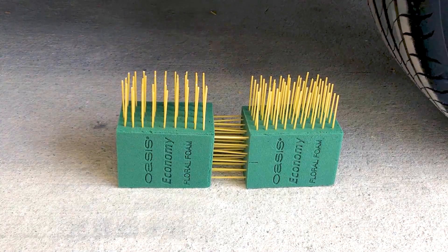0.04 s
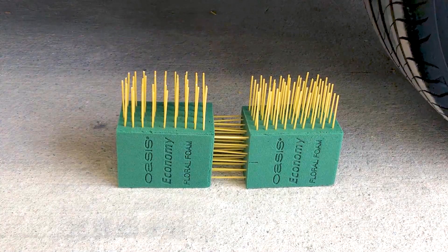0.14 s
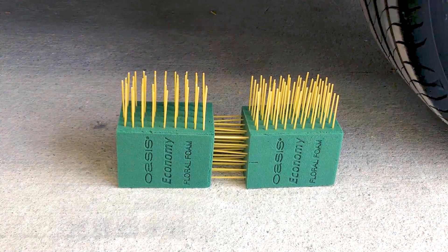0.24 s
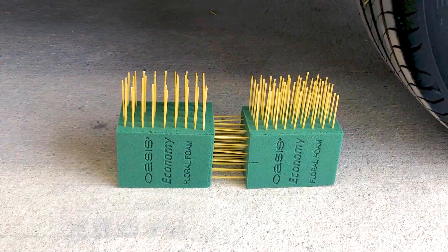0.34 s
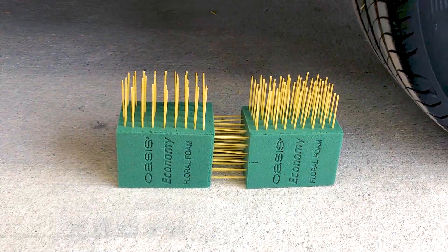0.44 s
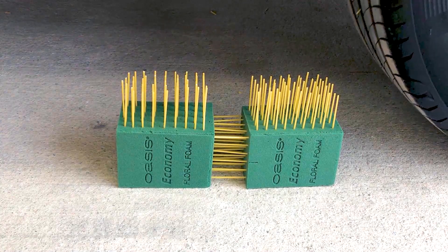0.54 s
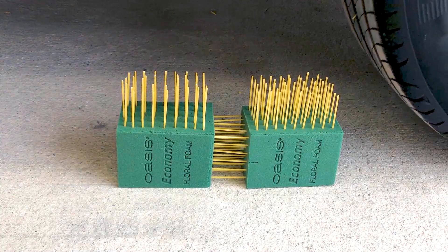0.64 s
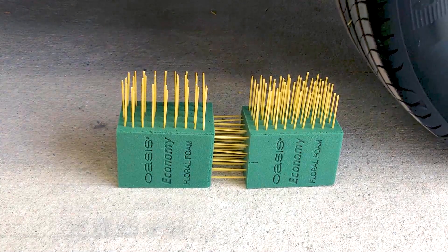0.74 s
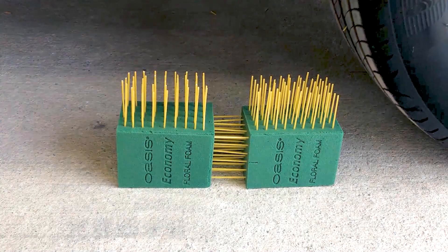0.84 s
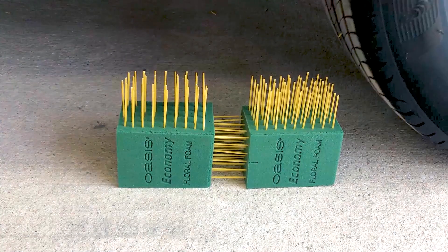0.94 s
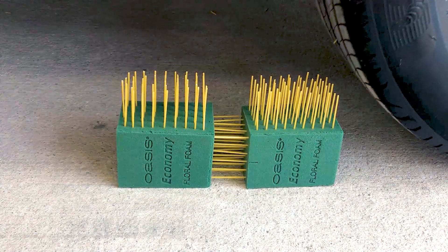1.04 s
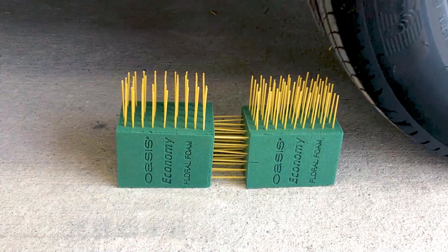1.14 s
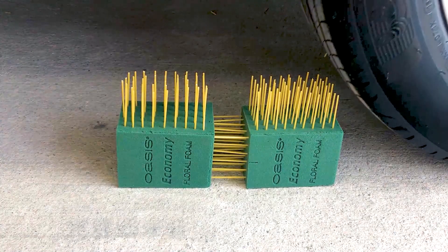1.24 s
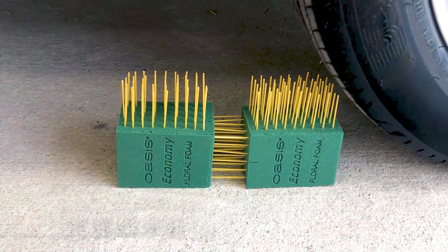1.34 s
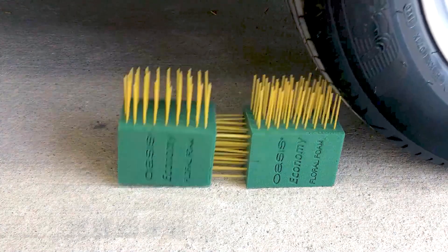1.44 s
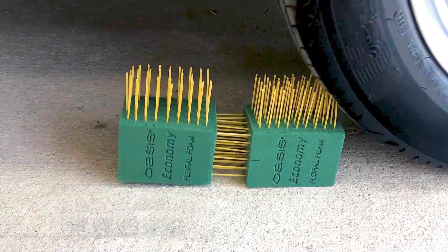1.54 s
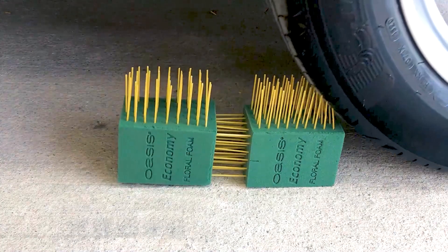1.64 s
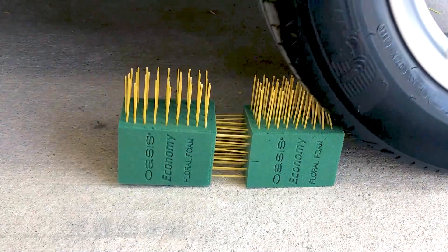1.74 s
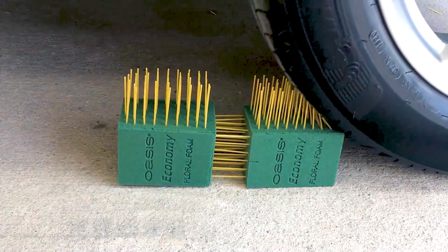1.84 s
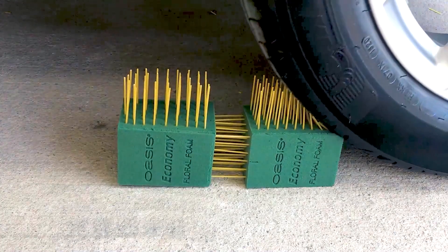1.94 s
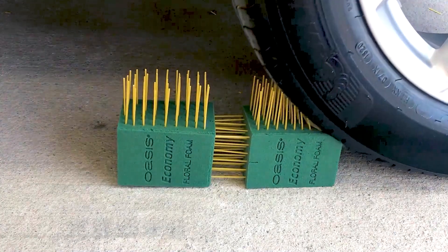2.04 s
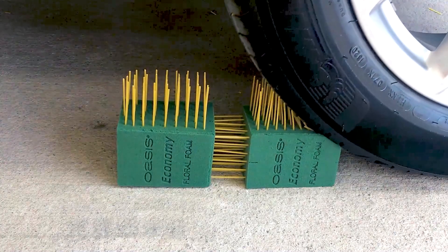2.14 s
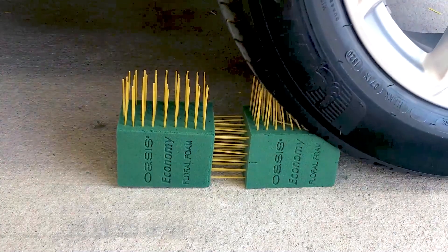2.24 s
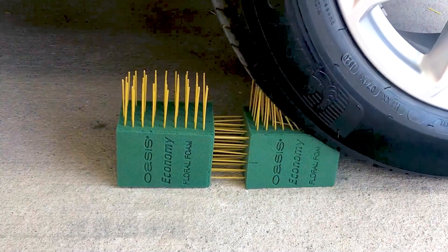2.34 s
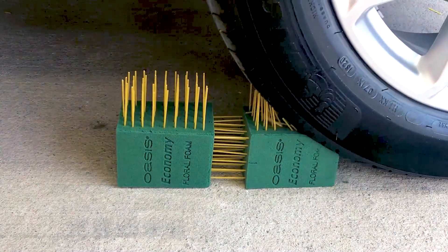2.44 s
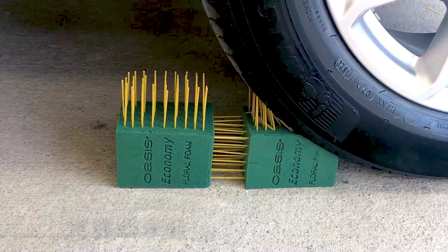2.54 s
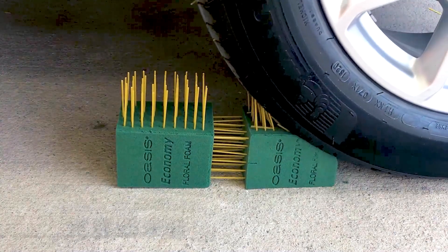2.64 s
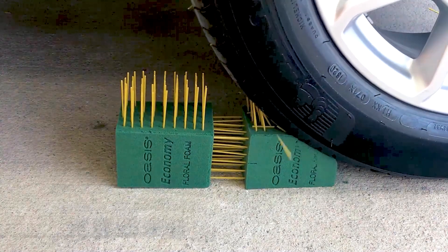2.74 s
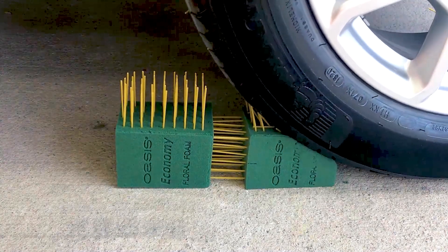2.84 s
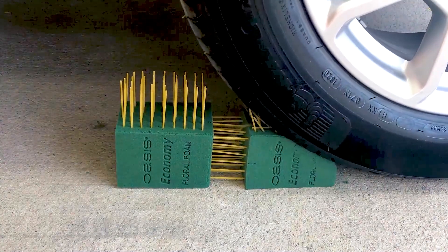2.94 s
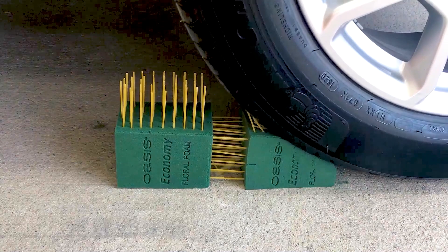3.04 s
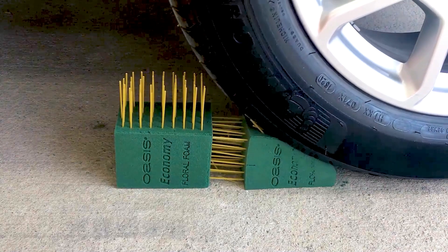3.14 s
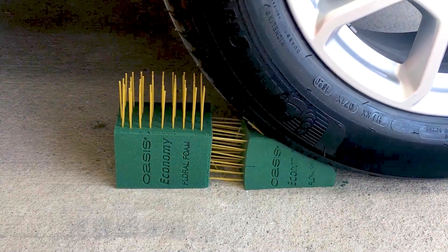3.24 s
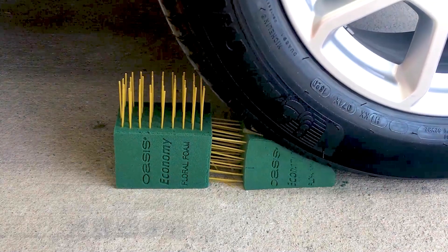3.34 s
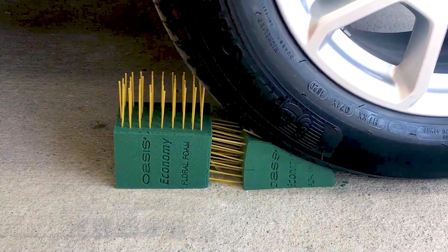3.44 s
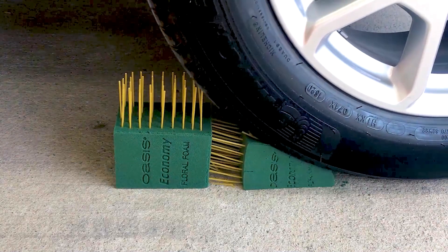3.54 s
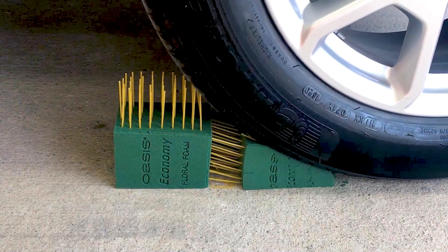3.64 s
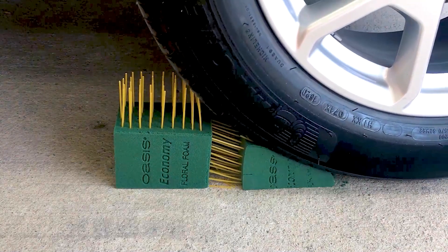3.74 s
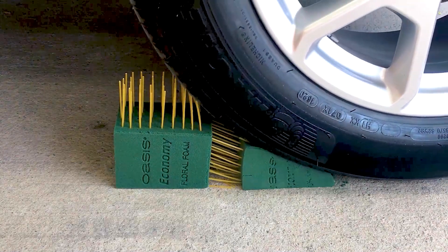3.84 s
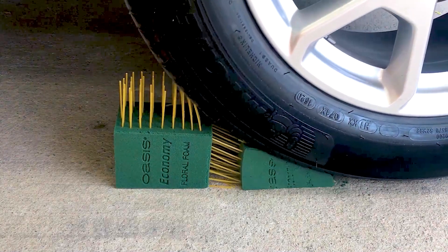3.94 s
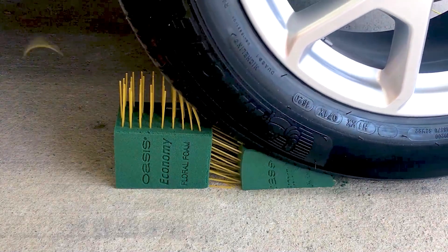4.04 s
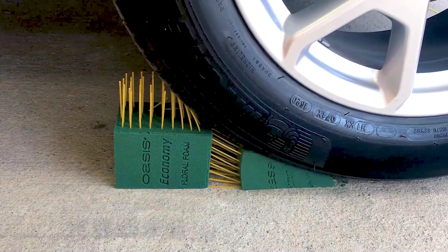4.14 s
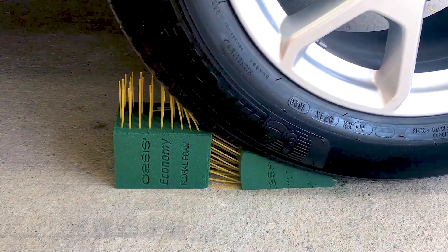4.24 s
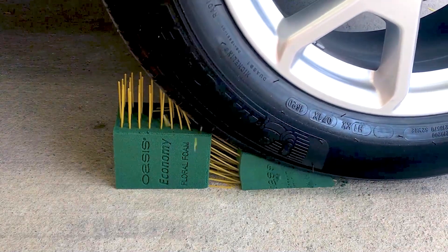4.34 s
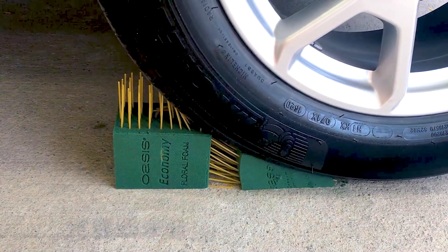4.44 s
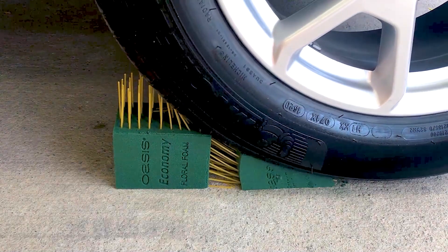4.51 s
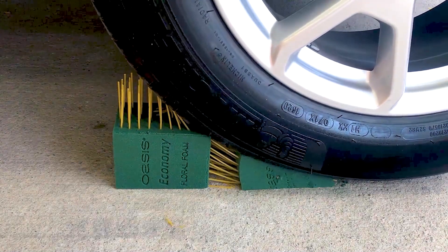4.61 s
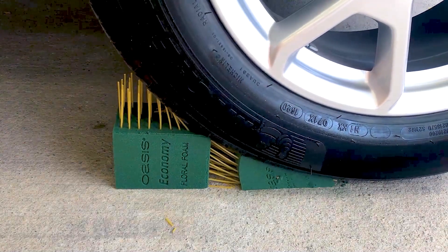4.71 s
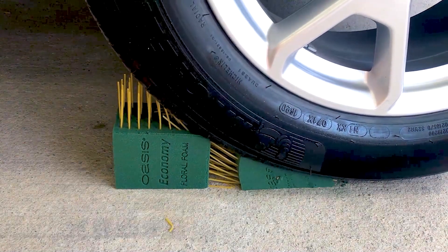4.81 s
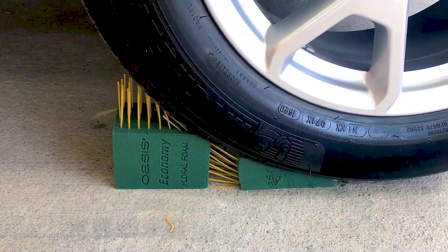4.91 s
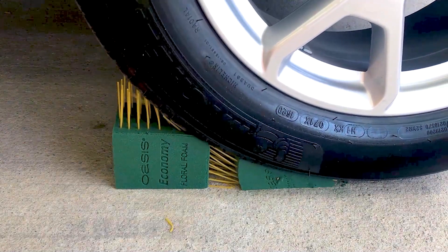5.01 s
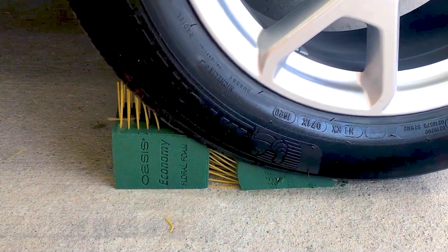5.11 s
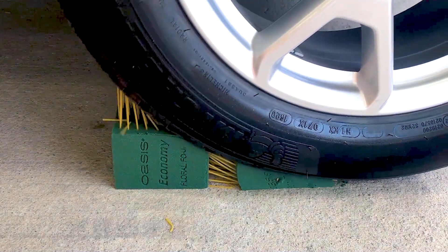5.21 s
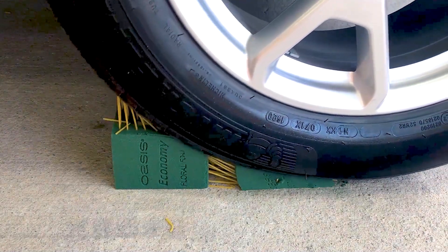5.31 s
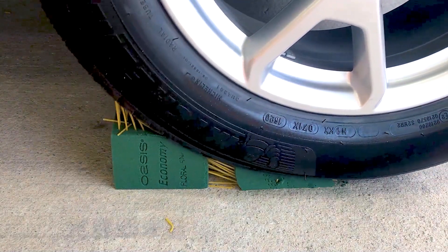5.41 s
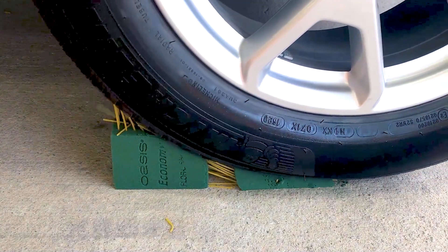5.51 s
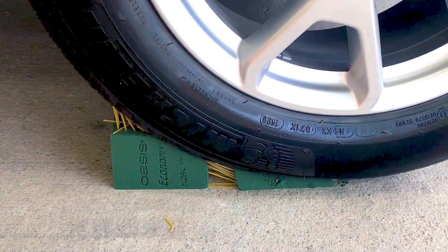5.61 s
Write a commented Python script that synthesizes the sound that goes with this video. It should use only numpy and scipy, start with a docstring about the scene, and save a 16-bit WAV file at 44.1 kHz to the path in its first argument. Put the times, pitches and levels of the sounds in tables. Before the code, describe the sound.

A steady engine idle rumbles quietly behind a slowly rolling tyre. Fine crisp foam hiss arrives first, quickly joined by bright dry stick cracks, tiny twangs and splintering, thickest around two seconds. Sparser snaps and fresh bursts follow, with low knocks near four seconds and a last lively cluster after five. The sound is close and mono, on concrete, with short reflections from the gap under the car.

```python
"""On concrete, near a single microphone, a car creeps over brittle foam blocks stuck full of thin wooden sticks.
Sticks slip, twang and snap one by one: decaying sines with wandering phase, and bursts of filtered noise.
The gap between car and ground answers snaps and thuds with a short echo, a convolution with decaying noise.
The tyre crushes foam cells with a fine hiss of spiky noise, and the blocks creak and shift with dull notes.
Behind them the engine idles: sines at multiples of the firing rate, resonant noise and pulsing clatter."""
import sys
import numpy as np
from scipy import signal
from scipy.fft import rfft, irfft, next_fast_len
from scipy.io import wavfile
from scipy.ndimage import map_coordinates

SR = 44100
rng = np.random.default_rng(int(sys.argv[2]) if len(sys.argv) > 2 else 0)


def bounce(signal):
    """Save signal as a 16-bit WAV file at the path given by the first command-line argument."""
    frames = np.transpose(np.atleast_2d(signal))
    limited = np.clip(frames, -1, 1)
    pcm = np.round(limited * 32767).astype(np.int16)
    wavfile.write(sys.argv[1], SR, pcm)


N = 250047  # samples

# The louder sticks. Each row: start in seconds, twang pitch in Hz, twang level in dB, crack pitch in Hz,
# crack level in dB, splinter level in dB, tail level in dB; levels are before filtering.
STICK_SNAPS = [(1.8695, 3240, -26, 4100, -20, -23, -36), (1.878, 3180, -36, 3430, -39, -39, -40),
               (1.9243, 1990, -22.5, 6660, -23, -29, -42), (1.9323, 1800, -37, 4270, -37, -36, -39),
               (1.9393, 2970, -25, 4690, -26, -25, -30), (1.9469, 2400, -19, 4440, -23, -26, -30),
               (1.9652, 2600, -19.5, 4300, -18, -24, -28), (1.9694, 1020, -30, 3340, -31, -38, -39),
               (1.9755, 990, -39, 3790, -48, -38, -39), (1.9835, 1080, -41, 4040, -40, -39, -43),
               (1.9947, 2740, -33, 3620, -36, -39, -42), (2.0051, 1410, -33, 7050, -28.5, -28, -37),
               (2.0149, 1310, -25.5, 3220, -26, -32, -40), (2.0583, 1820, -30, 5650, -26, -28, -38),
               (2.0654, 1530, -25.5, 6660, -28, -21, -34), (2.0726, 2660, -30, 3830, -39, -42, -47),
               (2.079, 1470, -39, 6840, -36, -44, -44), (2.0834, 1400, -32, 3710, -27, -23, -35),
               (2.1364, 2520, -24, 7700, -32, -26, -39), (2.1466, 2800, -35, 4100, -20.5, -27, -37),
               (2.176, 2580, -28, 5660, -32, -31, -48), (2.1888, 1320, -31, 6760, -27, -28, -39),
               (2.21, 1640, -25, 6050, -30, -25, -39), (2.2492, 1370, -35, 4300, -25, -26, -54),
               (2.2582, 1270, -30, 4100, -19.5, -35, -41.5), (2.3167, 2610, -30, 3760, -23, -33, -46),
               (2.3232, 1450, -31, 6750, -25, -31, -39), (2.3387, 1600, -24.5, 3730, -30, -24, -34),
               (2.345, 1700, -50, 6140, -46, -41, -40), (2.3844, 1210, -30.5, 4430, -25.5, -28, -44),
               (2.4398, 1600, -31, 4370, -37, -26, -48), (2.4602, 1370, -28, 7470, -26, -33, -38),
               (2.4766, 1410, -29, 6290, -31.5, -31, -39), (2.5204, 2090, -32, 4400, -26, -30, -39.5),
               (2.5242, 2060, -35.5, 5400, -25.5, -24, -49), (2.5448, 2000, -45, 4000, -43, -43, -50),
               (2.6092, 1180, -43, 6100, -34.5, -39, -47), (2.6201, 2040, -32, 5430, -29.5, -30, -42),
               (2.6905, 1180, -39, 3970, -32.5, -29, -49), (2.7414, 1050, -36.5, 3970, -32.5, -28, -39),
               (2.7536, 1660, -36, 3940, -28.5, -35, -41), (2.7988, 1015, -30.5, 4000, -26.5, -25.5, -35.5),
               (2.8785, 2960, -43, 4300, -34, -32, -45), (2.892, 1310, -39, 4000, -34.5, -29, -41),
               (2.9608, 1040, -39, 6330, -38, -41, -42.5), (3.0144, 3160, -39, 4560, -32, -30, -48),
               (3.0254, 960, -28, 4170, -26, -26, -38), (3.0418, 1080, -39, 4500, -29, -23, -41),
               (3.0527, 1120, -31, 4490, -27, -30, -40), (3.0747, 3230, -32, 7240, -23, -27, -33),
               (3.0889, 1390, -20, 4190, -30, -22, -31), (3.0944, 1630, -25, 4300, -36, -37, -35),
               (3.102, 1150, -30, 3800, -47, -41, -37), (3.1109, 1480, -24, 3490, -25, -32, -37),
               (3.123, 3120, -27, 6100, -23.5, -22.5, -35), (3.1433, 1480, -24, 3310, -30, -31, -40),
               (3.1686, 1210, -38, 4260, -26, -34, -45), (3.1775, 1500, -43, 3250, -41, -34, -37.5),
               (3.2174, 2690, -47, 4010, -42, -45, -62), (3.2495, 1370, -42, 6680, -26, -24, -42.5),
               (3.2664, 2910, -46, 3980, -40, -34, -50), (3.4004, 2540, -38, 3900, -47, -36, -52),
               (3.4322, 1010, -27, 4200, -39, -29, -35), (3.4415, 954, -36, 4280, -38, -30, -35.5),
               (3.469, 1050, -37, 7120, -52, -39, -44), (3.491, 1047, -26, 3180, -35, -29, -33),
               (3.4969, 1100, -44, 7190, -52, -48, -38), (3.506, 1030, -44, 3310, -56, -50, -39),
               (3.5304, 2570, -29, 3930, -36, -27, -45), (3.5396, 1820, -24, 6900, -25, -20, -28.5),
               (3.5445, 2550, -25, 3590, -36, -37, -28.5), (3.5497, 978, -24.5, 3300, -38, -37, -36),
               (3.5591, 1740, -28, 3310, -38, -37, -37), (3.5682, 1600, -29, 5460, -40, -35, -39),
               (3.5887, 1630, -21, 3360, -43, -38, -39), (3.6419, 1600, -39, 3870, -52, -45, -45),
               (3.653, 1900, -47, 6650, -40.5, -47, -54), (3.6897, 1690, -47, 4540, -40, -40, -57),
               (3.6993, 2580, -47, 4300, -43, -51, -49), (3.7605, 1530, -37, 3950, -44, -50, -46),
               (3.7831, 1630, -41, 5440, -38, -38, -53), (3.8236, 2560, -40, 4150, -41, -26.5, -51),
               (3.8318, 2670, -41, 3310, -43, -38, -55), (3.8671, 1130, -24.5, 6100, -34, -29, -37),
               (3.962, 3250, -41, 3370, -31.5, -31, -47), (3.9672, 3350, -30, 3360, -29, -31, -42.5),
               (3.9733, 1700, -37, 3300, -33.5, -30, -42), (3.9985, 3220, -34, 3500, -39, -41, -48),
               (4.0244, 1350, -25, 3670, -41, -41, -33), (4.0293, 1190, -22, 3360, -29, -27, -32),
               (4.0378, 1060, -24, 3700, -34, -34, -30.5), (4.042, 1540, -39, 6100, -31.5, -31, -31),
               (4.096, 1680, -34, 5200, -35, -29, -40), (4.1105, 2730, -35, 3310, -40, -34, -44),
               (4.1289, 2890, -46, 3310, -48, -43, -45), (4.1484, 3200, -49, 3760, -34, -29.5, -54),
               (4.1605, 1830, -42, 7060, -29, -34, -42), (4.1695, 2590, -44, 3280, -38, -29, -51),
               (4.1795, 1720, -33, 4170, -30, -28, -43), (4.1863, 1930, -30, 4120, -26.5, -36, -42),
               (4.1984, 2150, -47, 4290, -32, -34, -49), (4.2064, 1670, -26, 4250, -26, -31, -42),
               (4.2271, 2830, -39, 3330, -46, -37, -36), (4.2353, 1650, -31, 4220, -29, -37, -42),
               (4.2452, 1710, -30.5, 4500, -33, -43, -31), (4.2535, 2700, -29, 3400, -34, -26.5, -36),
               (4.2645, 2870, -41, 3730, -36, -34, -49), (4.2838, 2770, -35, 3300, -36, -39, -37),
               (4.2934, 2700, -29, 3330, -50, -42, -44), (4.3007, 1630, -32, 3350, -41, -36, -43),
               (4.3192, 1960, -52, 4340, -38, -44, -61), (4.3324, 1620, -37, 4200, -40, -34, -49),
               (4.3401, 1710, -37, 4400, -42, -32, -46), (4.3742, 1760, -39, 5000, -31.5, -35, -45),
               (4.3886, 1140, -36, 4010, -37, -29, -53), (4.4038, 2030, -40, 5480, -30, -39, -44),
               (4.4128, 1850, -48, 4600, -33, -38, -53), (4.4184, 2520, -42, 4790, -35, -32, -52),
               (4.4277, 1720, -43, 4300, -35, -35, -56), (4.4374, 2140, -45, 4220, -35, -34, -50),
               (4.446, 980, -51, 7340, -38, -37, -57), (4.4618, 1850, -36.5, 4100, -36, -37, -50),
               (4.4718, 1880, -48, 4440, -36, -36, -53), (4.4805, 1120, -45, 4470, -31, -37, -54),
               (4.508, 1970, -29, 4270, -31, -33, -40), (4.5123, 2150, -35, 6800, -27.5, -36, -47),
               (4.5424, 2230, -42, 4600, -38, -39, -52), (4.549, 1750, -34, 7390, -33, -42, -42),
               (4.577, 3100, -45, 3560, -41, -43, -53), (4.648, 2800, -38, 3310, -45, -52, -54),
               (4.6566, 2540, -41, 4240, -33.5, -27, -47), (4.6716, 3160, -38, 6140, -35, -38, -43),
               (4.6865, 3140, -34, 3100, -30, -36, -46), (4.6918, 880, -40, 5600, -40, -32, -52),
               (4.7097, 1670, -40, 4270, -35.5, -44, -59), (4.7617, 1200, -37, 4510, -29, -38, -47),
               (4.7896, 2770, -38, 3370, -35, -36, -48), (4.7997, 1910, -34, 3350, -39, -39, -45),
               (4.8387, 2780, -37, 5600, -27, -38, -46), (4.8592, 3170, -42, 5730, -28, -38, -43),
               (4.8811, 1800, -36, 4160, -43, -46, -55), (4.908, 910, -44, 4140, -25, -29.5, -40),
               (4.9353, 2610, -35, 5650, -30, -35, -43.5), (4.9419, 1480, -46, 5200, -37, -39, -49),
               (4.9721, 1100, -45, 3500, -49, -49, -53), (4.9844, 1490, -36, 4200, -34, -37, -41),
               (5.0502, 1330, -39, 7100, -36, -44, -46), (5.0643, 1080, -30, 3900, -23.5, -20.5, -36),
               (5.0798, 2610, -25, 4400, -23.5, -27, -30), (5.1499, 1620, -35, 5020, -39, -32, -38),
               (5.1561, 1740, -39, 3310, -41, -34, -47), (5.1904, 1600, -29, 3370, -27.5, -20.5, -41),
               (5.1972, 1640, -28.5, 8000, -31, -29, -33), (5.2077, 3220, -31, 3310, -33, -27, -42),
               (5.2262, 1590, -28.5, 6450, -20.5, -26, -36), (5.2342, 1520, -28, 5000, -41, -37, -43),
               (5.2489, 2070, -30.5, 5230, -27, -33, -38), (5.28, 1880, -37, 3300, -42, -47, -29.5),
               (5.2864, 1850, -42, 4400, -34, -31, -48), (5.312, 1720, -29, 3350, -39, -39, -31),
               (5.3187, 1920, -24, 6480, -28.5, -40, -33), (5.3305, 2430, -29, 4290, -33, -33, -43),
               (5.3728, 1760, -45, 3660, -47, -43, -53), (5.3949, 1050, -32, 3310, -50, -48, -43),
               (5.405, 1620, -31, 3310, -38, -34, -37), (5.4141, 1540, -38, 4600, -37, -36, -43),
               (5.429, 1680, -38, 3280, -45, -33, -41), (5.4451, 2220, -30.5, 3450, -33, -31, -37),
               (5.4823, 2690, -21, 3180, -31, -41, -36), (5.4907, 2000, -24, 6600, -37, -37, -46),
               (5.5308, 1840, -38, 3310, -39, -33, -54), (5.5432, 1290, -46, 6770, -52, -53, -52),
               (5.5642, 2690, -21.5, 3400, -32.5, -42, -41), (5.5772, 2500, -27.5, 3310, -45, -42, -40),
               (5.5837, 2760, -36, 3340, -38, -41, -41), (5.5884, 2960, -36, 3260, -31, -37, -43),
               (5.5964, 2870, -39, 3360, -41, -35, -49), (5.6206, 2820, -42, 3310, -46, -44, -51),
               (5.6371, 1710, -44, 4530, -44, -44, -56), (5.6559, 1200, -35.5, 5250, -33.5, -35, -39)]
# Colour of the crack noise. Each row: frequency in Hz, gain in dB.
CRACK_COLOUR = [(900, -16.5), (2000, -19.5), (3500, -13), (4300, 2.5), (5000, -9.5), (6400, 0.5),
                (8000, -6), (11000, -14)]
# Colour of the splintering noise. Each row: frequency in Hz, gain in dB.
SPLINTER_COLOUR = [(4000, -39), (7500, -7), (9000, -0.5), (11500, -0.5), (13000, -4.5), (15500, -5)]
RISE_S, TWANG_CYCLES = .00075, 9  # rise time of twang and crack; t60 of the twang in cycles
RING_SHARE = 0.53  # scales how far a long stick's own ring replaces the block's answer in the tail


def sticks():
    """Released strain energy: each stick twangs, cracks with one bright resonance, splinters and drives the block."""
    rows = np.vstack([STICK_SNAPS, faint_snaps()])
    s, hz, db, crack_hz, crack_db, splinter_db, tail_db = rows.T[:, :, None]
    start = s[:, 0]
    t = np.arange(SR // 16) / SR
    noise = rng.standard_normal((8, len(s), len(t)))
    twang_walk, ping_walk, crack_noise, splinter_noise = noise[:4]
    block_noise, crack_lead_in, splinter_lead_in, ring_walk = noise[4:]

    # the pitch wanders as the broken stick rattles in its hole and sags as it comes free
    sag = .0001 * (1 - np.exp(-t / .0006))
    phase = 2 * np.pi * hz * (t + sag) + .05 * np.cumsum(twang_walk, axis=1)
    twang = amp(db) * blow(t, RISE_S, TWANG_CYCLES / hz) * np.sin(phase)

    long = 1 / (1 + (hz / 1300) ** 6)  # near 1 for long, low sticks, which ring on
    ring_phase = phase + 0.097 * np.cumsum(ring_walk, axis=1)
    ring = 2 * RING_SHARE * long * amp(tail_db) * blow(t, 0.0025, 0.042) * np.sin(ring_phase)

    ping_phase = 2 * np.pi * crack_hz * t + 0.2 * np.cumsum(ping_walk, axis=1)
    ping = amp(crack_db) * blow(t, RISE_S, 0.0021) * np.sin(ping_phase)

    shape = blow(t, 0.00036, 0.0047) + 0.04 * blow(t, 0.0026, 0.027)
    lead_in = amp(-9 - 60 * t[::-1] / 0.013)  # a faint noise swells for some milliseconds before each snap
    before = start - t[-1]
    crack = laid(start, amp(crack_db) * shape * crack_noise)
    crack = crack + laid(before, amp(crack_db) * lead_in * crack_lead_in)
    crack = filtered(crack, lambda f: amp(along(CRACK_COLOUR, f)))
    splinter = laid(start, amp(splinter_db) * shape * splinter_noise)
    splinter = splinter + laid(before, amp(splinter_db) * lead_in * splinter_lead_in)
    splinter = filtered(splinter, lambda f: amp(along(SPLINTER_COLOUR, f)))

    passed = np.sqrt(np.mean(np.abs(block(np.linspace(1, SR / 2, 2048))) ** 2))  # rms of noise through the block
    answer_level = (1 - RING_SHARE * long) * amp(tail_db) / passed
    answer = filtered(laid(start, answer_level * blow(t, 0.00095, 0.015) * block_noise), block)
    return filtered(laid(start, twang + ring + ping), small) + crack + splinter + answer


# Mean levels of the faint snaps: twang, crack, splinter and tail, in dB before filtering.
FAINT_DB = [-53.5, -52.5, -50, -72]
# Pitch range of the faint snaps. Lowest row, then highest row: twang in Hz, crack in Hz.
FAINT_HZ = [(950, 3400), (3000, 7200)]
FAINT_COUNT, FAINT_SPREAD_DB = 110, 5.5  # levels lie within twice the spread of their mean


def faint_snaps():
    """A random point process: rows like STICK_SNAPS, scattered from the first loud snap to the end."""
    when, pitch, size = np.hsplit(rng.random((FAINT_COUNT, 7)), [1, 3])
    first = STICK_SNAPS[0][0]
    s = first + when * (N / SR - first)
    low, high = np.array(FAINT_HZ)
    hz = low * (high / low) ** pitch
    db = FAINT_DB + FAINT_SPREAD_DB * (4 * size - 2)
    return np.column_stack([s, hz[:, 0], db[:, 0], hz[:, 1], db[:, 1:]])


def blow(t, rise, fall):
    """Pulse envelope, peak 1: a soft rounded rise, then exponential decay with t60 fall."""
    risen = (t / rise) ** 2 / (1 + (t / rise) ** 2)
    e = risen * amp(-60 * t / fall)
    return e / e.max(axis=-1, keepdims=True)


# Resonances of the foam block. Each row: frequency in Hz, width in Hz, relative gain in dB.
BLOCK_MODES = [(990, 47, 15), (1130, 56, 13), (1560, 700, 12), (2820, 1300, 6)]


def block(f):
    """Modal resonance and weak bass radiation: the foam block as heard from outside."""
    return modes(BLOCK_MODES, f) * small(f)


def small(f):
    """Radiation efficiency: small things radiate no bass."""
    return f ** 4 / (f ** 4 + 750 ** 4)


# Shifts of the blocks. Each row: start in seconds, pitch in Hz, level in dB, t60 in seconds.
BLOCK_SHIFTS = [(3.542, 494, -37.5, 0.11), (3.94, 246, -25, 0.024), (3.978, 142, -36, 0.082),
                (4.03, 617, -30.5, 0.056), (4.067, 187, -40.5, 0.067), (5.065, 554, -39, 0.049),
                (5.2, 567, -32, 0.037)]


def thuds():
    """Damped oscillation: the block jerks on the concrete with a dull, short, unsteady note."""
    s, hz, db, t60 = np.transpose(BLOCK_SHIFTS)[:, :, None]
    t = np.arange(SR // 6) / SR
    drift = hz / 5000 * np.cumsum(rng.standard_normal((len(s), len(t))), axis=1)
    envelope = amp(db - 60 * t / t60) * (1 - np.exp(-t / .003))
    return laid(s[:, 0], envelope * np.sin(2 * np.pi * hz * t + drift))


# Course of the crushing. Each row: time in seconds, relative cell hiss in dB, block creak in dB,
# fine dust relative to the hiss in dB.
CRUSHING = [(1.56, -52, -61, -4), (1.64, -44, -55.5, -4), (1.8, -41, -61, -3.5), (1.93, -41.5, -47.5, 0),
            (2.07, -43.5, -52, -0.5), (2.31, -45, -51.5, 0.5), (2.49, -50.5, -60, 4.5), (2.98, -55, -63, 9),
            (3.4, -63, -76, 11), (3.59, -61.5, -59, 6), (3.87, -57.5, -70, 3), (4.1, -51.5, -53, 0),
            (4.5, -68, -63, 7), (4.7, -60, -71, -4), (4.94, -64, -66, 3), (5.3, -50.5, -54, 2),
            (5.67, -61.5, -62, 3)]
# Colour of the bursting cells. Each row: frequency in Hz, relative density in dB per Hz.
CELL_COLOUR = [(880, -59), (1500, -44), (1950, -13), (2270, -14), (2500, 4), (3220, -3), (4190, 3),
               (5020, -2.5), (6370, 3), (7690, -2.5), (9000, -1.5), (11700, -14), (19800, -120)]
# Colour of the finest debris. Each row: frequency in Hz, relative density in dB per Hz.
DUST_COLOUR = [(5000, -52), (8600, -1), (10300, 3), (11800, 11), (13000, 0), (15800, 8.5)]


def foam():
    """Superposed impulses: cells burst in a dense hiss with finer dust; slower slips excite the block itself."""
    hiss_db, creak_db, dust_db = curves(CRUSHING)
    cells = coloured(grains(spiky_db=1.8), CELL_COLOUR) * amp(1.2 * wobble(60))
    dust = coloured(grains(spiky_db=1.8), DUST_COLOUR) * amp(dust_db + 1.2 * wobble(60))
    hiss = .7 * amp(hiss_db) * (cells + dust)
    creak = unit(filtered(grains(spiky_db=2.5), block)) * amp(creak_db + 1.8 * wobble(40))
    touching = np.clip((np.arange(N) / SR - CRUSHING[0][0]) / .035, 0, 1)  # the tread settles on the foam
    return touching * (hiss + creak)


# Decay of the gap under the car. Each row: frequency in Hz, t60 in seconds.
GAP_DECAY = [(500, 0.29), (2000, 0.094), (6000, 0.16), (15000, 0.21)]


def underside(x):
    """Reverberation between car and concrete; each third of a second gets its own tail."""
    out, hop = np.zeros(N + SR), SR // 3
    delay = 90  # samples
    for a in range(0, N, hop):
        hz, t, z = signal.stft(rng.standard_normal(SR // 4), SR, nperseg=128)
        decay = amp(-60 * t / along(GAP_DECAY, hz)[:, None])
        tail = signal.istft(z * decay, SR, nperseg=128)[1]
        part = signal.fftconvolve(x[a:a + hop], tail / np.linalg.norm(tail))
        out[a + delay:a + delay + len(part)] += part
    return out[:N]


# Engine speed. Each row: time in seconds, firings per second.
FIRING_RATE = [(0, 28.35), (1.1, 28.2), (2.7, 28.45), (3.7, 28.5), (3.9, 28.3), (4.9, 28.32), (5.2, 30.2),
               (5.67, 30.3)]
# Low engine orders. Each row: time in seconds, level in dB.
LOW_ORDER_LEVEL = [(0, -53), (1.9, -53.5), (3.65, -55.5), (3.81, -63), (3.9, -51.5), (3.99, -63),
                   (4.07, -53.5), (4.3, -61), (4.55, -55.5), (4.65, -52), (4.96, -53.5), (5.08, -65),
                   (5.18, -62), (5.4, -89), (5.67, -61)]
# Engine orders. Each row: multiple of the firing rate, relative level in dB.
ENGINE_ORDERS = [(1, -25), (2, 9.5), (3, 11), (4, -12), (5, -16), (6, -40.5), (7, -18), (8, -15.5),
                 (9, -36), (10, -15), (11, -48), (12, -11.5), (13, -13), (14, -5.5), (15, -15), (16, -48)]
# Noise from the engine bay. Each row: frequency in Hz, relative density in dB per Hz.
BAY_COLOUR = [(18, -31), (30, -7), (86, -7), (113, -15), (149, -5.5), (194, -15.5), (214, -10),
              (282, -12.5), (307, -11), (398, -10.5), (477, -20), (630, -17), (730, -14), (1010, -58),
              (1500, -42), (1950, -48), (3300, -120)]
# Valve clatter. Each row: frequency in Hz, relative density in dB per Hz.
VALVE_COLOUR = [(700, -9), (1040, -3.5), (1650, -9), (1950, -4.5), (2350, -9), (3000, -10.5), (3530, -14.5),
                (4700, -18.5), (6100, -16), (7600, -24), (9100, -16), (10500, -26), (11200, -21.5),
                (13600, -20), (15800, -23)]
# Ringing engine parts. Each row: frequency in Hz, width in Hz, relative gain in dB.
PART_MODES = [(635, 35, 0), (1045, 20, -7), (1212, 20, -11), (2345, 40, -13), (3520, 70, -12)]


def engine():
    """Harmonic synthesis of the orders; bay noise, clatter and ringing parts swell once a firing."""
    rate = curves(FIRING_RATE)[0]
    turns = np.cumsum(rate) / SR + .04  # firings so far
    low = high = 0
    for k, db in ENGINE_ORDERS:
        phase = k * turns + rng.random() + .05 * wobble(8)
        tone = amp(db + 1.1 * wobble(12)) * np.sin(2 * np.pi * phase)
        if k < 4:
            low = low + tone
        else:
            high = high + tone
    low = amp(curves(LOW_ORDER_LEVEL)[0] + 0.4 * wobble(7)) * unit(low)
    high = amp(-55 - 1.2 * (rate - FIRING_RATE[0][1])) * high  # weaker as the engine speeds up

    since = turns % 1  # fraction of a firing period
    strength_db = 1.4 * rng.standard_normal(int(turns[-1]) + 1)[turns.astype(int)]  # one draw per firing
    knock = amp(strength_db) * np.exp(-since / .33) * (1 - np.exp(-since / .1))
    clatter = amp(-59) * coloured(rng.standard_normal(N), VALVE_COLOUR) * unit(.3 + knock)
    bay = coloured(rng.standard_normal(N), BAY_COLOUR) * amp(-58.5 + 2.6 * wobble(3.68)) * unit(1.65 + knock)
    struck = rng.standard_normal(N) * (0.26 + knock)
    ring = amp(-61.5) * unit(filtered(struck, lambda f: modes(PART_MODES, f)))
    return low + high + bay + clatter + ring


def modes(table, f):
    """Modal superposition: complex response of (Hz, width, dB) resonances with alternating sign."""
    total = 0
    for k, (centre, width, db) in enumerate(table):
        damping = 1j * f * width
        total = total + (-1) ** k * amp(db) * damping / (centre * centre - f * f + damping)
    return total


def amp(db):
    """Decibel law: gain of a level in dB."""
    return 10 ** (np.asarray(db) / 20)


def unit(x):
    """Power normalisation: scaled to rms 1."""
    return x / np.sqrt(np.mean(x ** 2) + 1e-20)


def along(points, hz):
    """Logarithmic frequency scale: interpolation of (Hz, value) points."""
    f, v = np.transpose(points)
    return np.interp(np.log(hz + 1), np.log(f + 1), v)


def curves(rows):
    """Linear interpolation in time: one value per sample for each column after the time."""
    s, *cols = np.transpose(rows)
    return [np.interp(np.arange(N) / SR, s, c) for c in cols]


def wobble(rate):
    """Slow random modulation: a smooth curve with rate knots a second."""
    knots = rng.standard_normal(int(N * rate / SR) + 4)
    return map_coordinates(knots, [np.arange(N) * rate / SR])


def filtered(x, response):
    """Linear filtering: the spectrum of x times a complex response of frequency."""
    m = next_fast_len(N + SR // 2)
    return irfft(rfft(x, m) * response(np.fft.rfftfreq(m, 1 / SR)), m)[..., :N]


def coloured(x, spectrum):
    """Spectral shaping by (Hz, dB) points, then scaling to rms 1."""
    return unit(filtered(x, lambda hz: amp(along(spectrum, hz))))


def grains(spiky_db):
    """Impulsive noise: now and then a sample stands out."""
    return rng.standard_normal(N) * amp(spiky_db * rng.exponential(size=N))


def laid(times, rows):
    """Superposition of short sounds, one row for each start time."""
    at = np.round(np.asarray(times) * SR).astype(int)[:, None] + np.arange(rows.shape[1])
    return np.bincount(at.ravel(), rows.ravel(), N + rows.shape[1])[:N]


def scene():
    """Superposition of all sources at one microphone, heard alike on both channels."""
    hits = sticks() + thuds()
    echo = amp(-7) * underside(hits)
    return np.tile(hits + echo + foam() + engine(), (2, 1))


def record(dry):
    """Band limiting: the small microphone drops the deepest bass; nothing is kept from 15750 Hz up."""
    return filtered(dry, lambda hz: hz ** 4 / (hz ** 4 + 36 ** 4) * (hz < 15750))


dry = scene()
out = record(dry)
bounce(out)
```